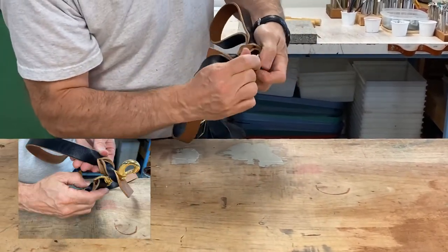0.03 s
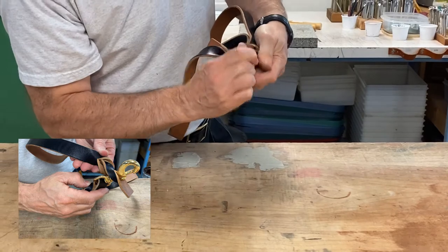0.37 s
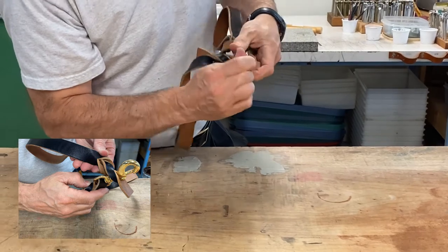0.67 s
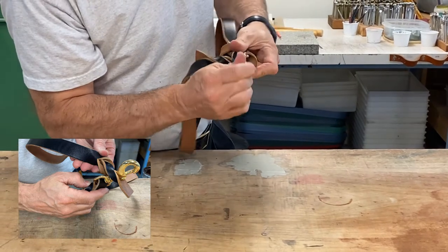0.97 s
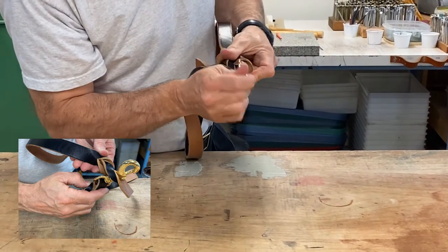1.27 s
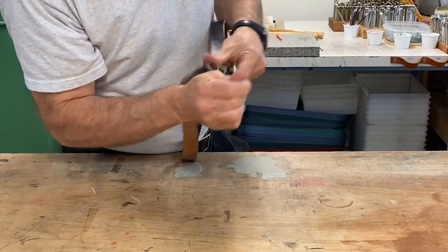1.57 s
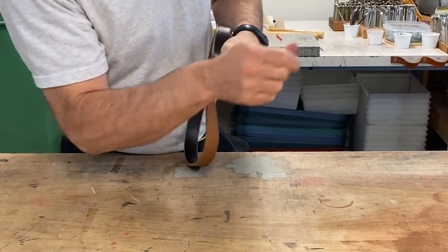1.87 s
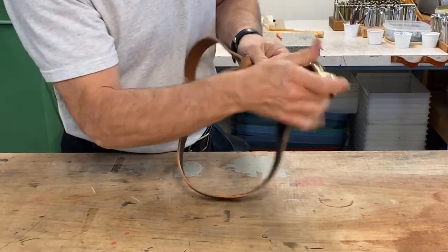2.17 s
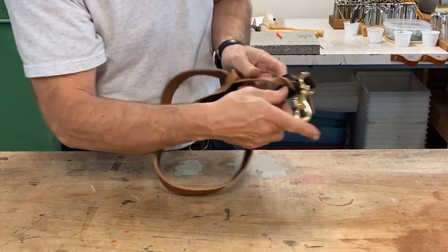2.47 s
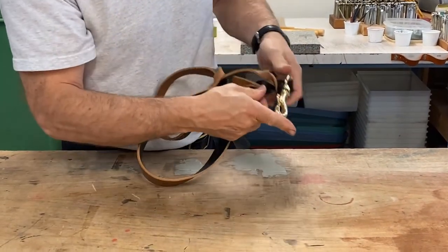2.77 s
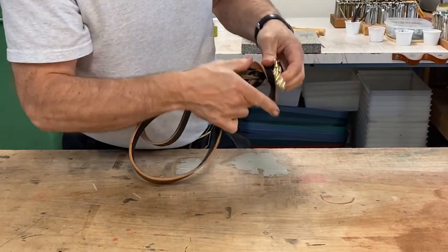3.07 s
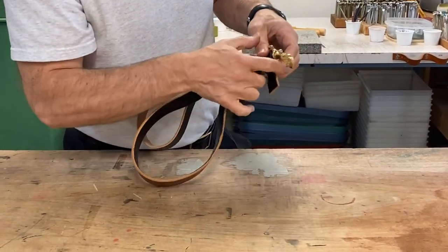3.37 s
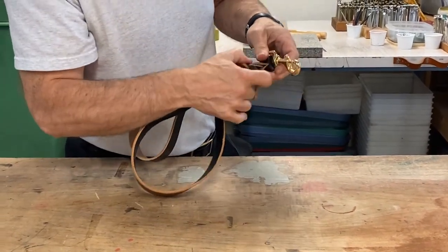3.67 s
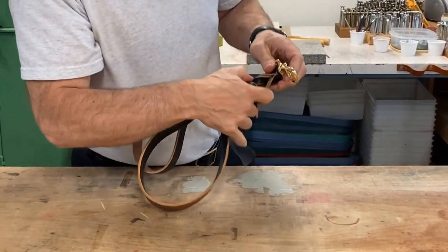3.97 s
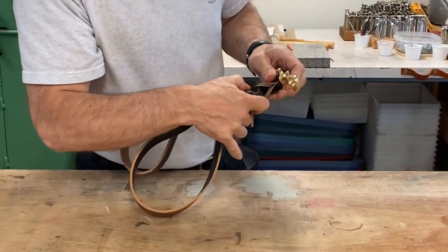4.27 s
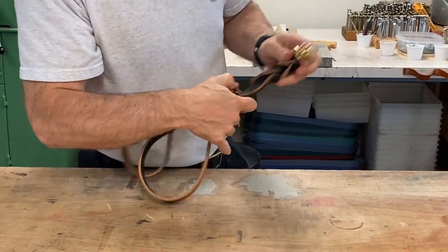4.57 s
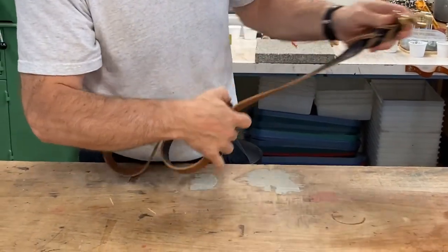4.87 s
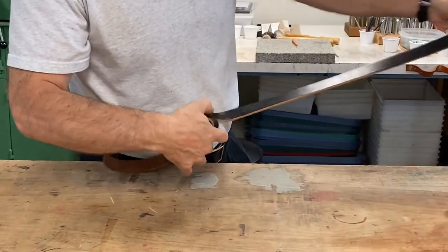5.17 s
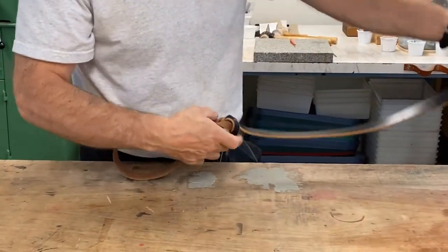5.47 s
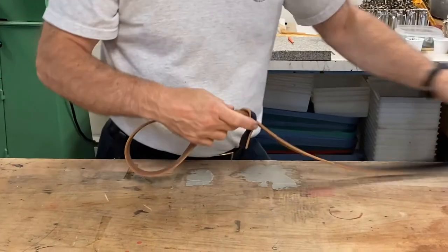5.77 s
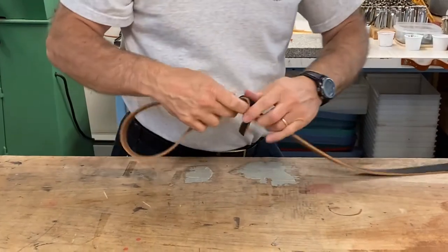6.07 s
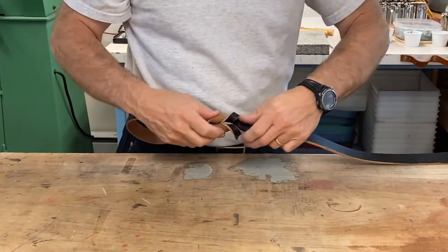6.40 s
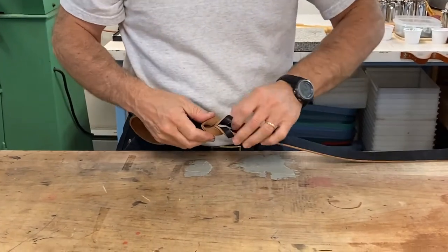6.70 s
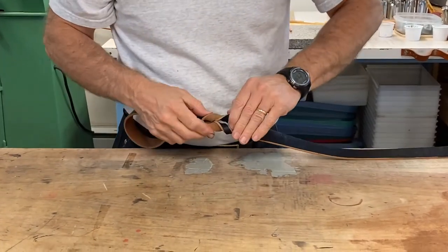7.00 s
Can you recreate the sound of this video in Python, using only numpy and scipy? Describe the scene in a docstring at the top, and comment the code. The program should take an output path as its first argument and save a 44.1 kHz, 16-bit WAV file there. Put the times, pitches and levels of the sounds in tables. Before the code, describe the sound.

Hands work a leather leash through its own slots, making short dry rubs, creaks and soft flaps while the brass fittings tick lightly. The strap is pulled out in one longer hissing slide. Then its brass snap drops on a wooden workbench with a loud, booming knock, and a few faint rustles follow. The microphone is close, in a small workshop with a low ventilation rumble.

```python
"""A low workshop rumble, and over it a leather leash worked through its own slots: it hisses, drags and
flaps by friction and bending, while its brass fittings tick. The strap is pulled out long. Then its
brass snap drops on the wooden bench and bounces; the impacts set the modes of the top booming and
overload the microphones of a nearby phone."""
import sys
import numpy as np
from scipy import signal
from scipy.fft import rfft, irfft
from scipy.io import wavfile
from scipy.ndimage import uniform_filter1d

SR = 44100
rng = np.random.default_rng(int(sys.argv[2]) if len(sys.argv) > 2 else 0)


def pcm_store(signal):
    """Save signal as 16-bit PCM."""
    levels = np.round(np.clip(np.atleast_2d(signal), -1, 1) * 32767)
    wavfile.write(sys.argv[1], SR, levels.astype(np.int16).T)


N = 310464
TIME = np.arange(N) / SR


def undb(db):
    """Decibels to amplitude gain."""
    return 10 ** (np.asarray(db) / 20)


def unit(x):
    """Normalise to rms 1."""
    return x / np.sqrt(np.mean(x ** 2))


def at_hz(points, hz):
    """Interpolate (Hz, value) points on a log-frequency axis."""
    f, value = np.transpose(points)
    return np.interp(np.log(np.maximum(hz, 1)), np.log(f), value)


def colour(x, points):
    """Minimum-phase filter with the given (Hz, dB) shape and unit power gain."""
    size = 4096
    magnitude = undb(at_hz(points, np.fft.rfftfreq(size, 1 / SR)))
    cepstrum = irfft(np.log(magnitude))
    cepstrum[1:size // 2] *= 2
    cepstrum[size // 2 + 1:] = 0
    response = irfft(np.exp(rfft(cepstrum)))
    return signal.fftconvolve(x, response / np.linalg.norm(response))[:len(x)]


def drift(hz):
    """Smooth random fluctuation with a spread near 1."""
    hold = int(SR / hz)
    steps = np.repeat(rng.standard_normal(N // hold + 1), hold)
    return 1.4 * uniform_filter1d(steps, hold)[:N]


def add(track, start_s, sound):
    """Superpose a sound on a track."""
    i = int(start_s * SR)
    track[i:i + len(sound)] += sound[:N - i]


def ring(modes, t, scatter_db, detune):
    """Free vibration is a sum of damped modes; each contact shifts their weights and pitches a little."""
    hz, db, t60 = np.transpose(modes)[:, :, None]
    size = undb(db + scatter_db * rng.standard_normal(hz.shape))
    size[1::2] *= -1  # neighbouring modes swing in opposite directions
    hz = hz * (1 + detune * rng.standard_normal(hz.shape))
    return np.sum(size * np.sin(2 * np.pi * hz * t) * np.exp(-np.log(1000) * t / t60), axis=0)


# Room rumble. Each row: frequency in Hz, relative spectral density in dB.
RUMBLE_SPECTRUM = [(20, -31), (40, -8.5), (62, 1.5), (80, -5), (120, -11.5), (165, -23), (260, -24),
                   (500, -30), (800, -34.5), (1300, -47.5), (3000, -58), (16000, -57)]
# Ventilation tones. Each row: frequency in Hz, mean level in dB.
HUM_TONES = [(479.1, -69.5), (597.5, -76), (839.8, -75.5), (1082, -79.5)]

def ventilation(level_db=-46, side_db=-6, waver_db=2):
    """Broadband rumble and a few faint tones, all under slow random modulation."""
    mid, side = (colour(rng.standard_normal(N), RUMBLE_SPECTRUM) * undb(.5 * drift(1.7)) for _ in range(2))
    side = undb(side_db) * side
    hum = sum(undb(db + waver_db * drift(2.3)) * np.sin(2 * np.pi * hz * TIME + drift(1.7))
              for hz, db in HUM_TONES)
    return undb(level_db) * np.array([mid + side, mid - side]) + hum


# Reverberation time. Each row: frequency in Hz, time to fall 60 dB in seconds.
ROOM_DECAY = [(100, 0.73), (400, 0.46), (2000, 0.47), (6000, 0.43), (15000, 0.35)]
# Width of the echoes. Each row: frequency in Hz, side level against mid in dB.
ROOM_WIDTH = [(100, -6.5), (500, -4), (1300, -4), (2500, -7), (4000, -19.5), (7000, -21), (9000, -9)]

def reverberation(x, build_s=0.0019):
    """A diffuse field builds up, then decays exponentially; the treble dies first."""
    hz, t, cells = signal.stft(rng.standard_normal((2, SR)), SR, nperseg=256)
    cells = cells * np.exp(-np.log(1000) * t / at_hz(ROOM_DECAY, hz)[:, None])
    cells[1] *= undb(at_hz(ROOM_WIDTH, hz))[:, None]
    build = (1 - np.exp(-TIME[:SR] / build_s)) ** 2
    mid, side = signal.istft(cells)[1][:, :SR] * build
    response = np.array([mid + side, mid - side]) / np.linalg.norm(mid)
    return signal.fftconvolve(x[None], response, axes=1)[:, :N]


# Balance of the microphone ports. Each row: frequency in Hz, left minus right in dB.
PORT_BALANCE = [(80, -3), (220, 7), (1300, 4.5), (2300, 0), (15000, 0)]
# Phase between the ports. Each row: frequency in Hz, lead of the left in radians.
PORT_LEAD = [(120, 0.86), (700, 0), (1400, 1.4), (1900, 0.22), (3500, 0), (7400, 0), (9200, -3.5),
             (11100, -6), (13200, -10), (15200, -11.5)]

def ports(x):
    """Level and phase differences give direction: low mids lean left, the top treble leads on the right."""
    hz = np.fft.rfftfreq(N, 1 / SR)
    lean = undb(at_hz(PORT_BALANCE, hz) / 2)
    turn = np.exp(1j * at_hz(PORT_LEAD, hz))
    return irfft(rfft(x) * np.array([lean * turn, 1 / lean]), N)


def friction(spectrum, slips_per_s, spread_db):
    """Tiny slips make shot noise; as the contact travels, narrow upper resonances come and go. Rms 1."""
    slips = rng.random(N) < slips_per_s / SR
    size_db = spread_db * np.minimum(rng.exponential(size=N), 5)
    impulses = unit(slips * rng.choice([-1, 1], N) * undb(size_db))
    hz, _, cells = signal.stft(colour(impulses, spectrum), SR, nperseg=512)
    depth_db = np.interp(hz, [500, 1800], [1, 3.6])[:, None]
    ripple = uniform_filter1d(rng.standard_normal(cells.shape), size=4, axis=0)  # smooth in frequency
    ripple = uniform_filter1d(ripple, size=12, axis=1)  # and in time
    return unit(signal.istft(cells * undb(depth_db * unit(ripple)))[1][:N])


# Fibre hiss and edge drag. Each row: frequency in Hz, relative spectral density in dB.
HISS_SPECTRUM = [(1800, -16.5), (2800, -0.5), (4300, 1), (6500, -3), (8500, -2.5), (12000, -4.5),
                 (16000, -9)]
DRAG_SPECTRUM = [(120, -5.5), (220, 12), (400, 4.5), (700, 2.5), (1300, -0.5), (2300, -1.5), (3200, -10.5),
                 (5000, -24.5)]
# Short pushes by the fingers. Each row: middle and length in seconds, hiss and drag levels in dB.
FINGER_STROKES = [(0.302, 0.057, -54.5, -60), (0.455, .06, -60, -90), (0.593, 0.071, -53.5, -49),
                  (0.783, 0.12, -66, -66), (0.997, 0.064, -59, -66), (1.188, 0.2, -66, -68),
                  (1.624, 0.087, -39.5, -39), (1.871, 0.11, -61, -62.5), (1.984, 0.27, -59.5, -61.5),
                  (2.227, 0.059, -49.5, -50), (2.411, 0.062, -58.5, -53.5), (2.557, 0.1, -55, -52.5),
                  (2.691, 0.14, -47, -51.5), (2.88, 0.051, -54.5, -50), (2.998, 0.27, -58, -83),
                  (3.196, 0.14, -56.5, -66), (3.267, .06, -56, -55.5), (3.396, .05, -55.5, -51.5),
                  (3.599, 0.22, -53, -56.5), (3.757, 0.051, -44.5, -47.5), (3.853, .045, -44, -44.5),
                  (3.947, 0.058, -57, -54.5), (4.203, 0.067, -56, -53), (4.367, 0.19, -52, -51.5),
                  (4.496, .035, -47, -48), (5.682, 0.07, -56, -47), (5.786, 0.14, -53.5, -63),
                  (6.172, 0.16, -56.5, -70.5), (6.503, 0.047, -65, -69), (6.64, .06, -67.5, -78),
                  (6.8, 0.15, -72.5, -78), (7.02, 0.042, -60, -62)]
# The whole strap runs through the slot. Each row: time in seconds, hiss and drag levels in dB.
LONG_PULL = [(4.53, -62, -55), (4.58, -45.5, -45.5), (4.72, -50.5, -49), (4.82, -45.5, -49.5),
             (4.99, -40, -52.5), (5.11, -49, -56), (5.25, -56, -58), (5.295, -51, -43), (5.34, -96, -62)]

def sliding(grip_hz=70, hiss_grip_db=0.9, drag_grip_db=1.15, fidget_hz=7, fidget_db=3.5):
    """Sliding friction: fibres slip in a fine hiss, while the edges catch in coarser, uneven steps."""
    t = TIME[::40]
    middle, length, stroke_hiss_db, stroke_drag_db = np.transpose(FINGER_STROKES)[:, :, None]
    swells = np.exp(-np.abs(2 * (t - middle) / length) ** 1.7)  # exponent 1 is pointed, 2 bell-shaped
    pull_s, pull_hiss_db, pull_drag_db = np.transpose(LONG_PULL)
    waver_db, grip = fidget_db * drift(fidget_hz), drift(grip_hz)

    def effort(stroke_db, pull_db, held_db):
        """One gain for the strokes, the pull and the rustle of a strap never held quite still."""
        strokes = np.interp(TIME, t, np.linalg.norm(undb(stroke_db) * swells, axis=0))
        pull = undb(np.interp(TIME, pull_s, pull_db)) * (TIME > pull_s[0]) * (TIME < pull_s[-1])
        return np.hypot(strokes, pull + undb(held_db + waver_db))

    hiss = friction(HISS_SPECTRUM, slips_per_s=4600, spread_db=2.5) * undb(hiss_grip_db * grip)
    drag = friction(DRAG_SPECTRUM, slips_per_s=1100, spread_db=3.0) * undb(drag_grip_db * grip)
    hiss *= effort(stroke_hiss_db, pull_hiss_db, held_db=-77)
    drag *= effort(stroke_drag_db, pull_drag_db, held_db=-78.5)
    return hiss + drag


# Response of the shaken strap. Each row: frequency in Hz, relative spectral density in dB.
SCUFF_SPECTRUM = [(100, -25.5), (220, -1.5), (330, 3), (490, 2), (700, -19), (1100, -15), (1450, -21.5),
                  (2050, -13.5), (2450, -14), (3000, -26), (6000, -43)]
# The strap jerks through a slot or brushes past. Each row: middle and length in seconds, level in dB.
STRAP_SCUFFS = [(1.63, 0.12, -45.5), (2.431, 0.092, -49.5), (2.583, 0.079, -40.5), (2.666, 0.059, -36.5),
                (2.714, 0.054, -33.5), (2.875, 0.0344, -34), (3.857, 0.014, -46), (4.382, 0.06, -39.5),
                (4.572, 0.047, -36.5), (4.66, 0.097, -46.5), (4.907, 0.13, -49), (5.214, 0.21, -52),
                (5.694, 0.16, -46.5)]

def scuffs():
    """Stick-slip motion shakes the whole strap, which answers with a hollow, creaking rasp."""
    pressure = sum(undb(db) * np.exp(-np.abs(2 * (TIME - middle) / length) ** 3)
                   for middle, length, db in STRAP_SCUFFS)
    return pressure * friction(SCUFF_SPECTRUM, slips_per_s=370, spread_db=-0.74)


# Leather faces rasp as they flap. Each row: frequency in Hz, relative spectral density in dB.
RASP_SPECTRUM = [(100, -16), (200, 2.5), (500, 0.5), (900, -11.5), (2000, -24), (6000, -44)]
# A loop flexes and lets go. Each row: start in seconds, peak level in dB, first and last pitch in Hz.
LOOP_FLAPS = [(1.21, -36.5, 620, 270), (1.545, -32, 810, 270), (2.202, -26, 1830, 270),
              (2.675, -23.5, 715, 325), (2.696, -28, 680, 355), (3.287, -39, 2140, 425),
              (4.6, -21.5, 600, 275), (4.678, -33.5, 830, 330), (4.858, -31, 600, 310),
              (5.113, -36, 1490, 285), (5.288, -36, 700, 295), (5.324, -35, 610, 300),
              (6.104, -28, 550, 300), (6.276, -34, 500, 300), (6.527, -40.5, 500, 308),
              (6.983, -31, 550, 270)]

def flaps(glide_s=.002, rise_s=0.019, fade_s=0.0036, echo_s=.0155, echo_db=-7, rasp_db=-11):
    """Dispersion: short bending waves run faster, so each flap falls in pitch. Its low end returns once."""
    out, t = np.zeros(N), TIME[:SR // 10]
    shape = (1 - np.exp(-t / rise_s)) ** 2 * np.exp(-t / fade_s)
    for start, db, first_hz, last_hz in LOOP_FLAPS:
        hz = last_hz + (first_hz - last_hz) * np.exp(-t / glide_s)
        swing = undb(db) * shape / shape.max()
        rasp = undb(rasp_db) * colour(rng.standard_normal(len(t)), RASP_SPECTRUM)
        add(out, start, swing * (np.sin(2 * np.pi * np.cumsum(hz) / SR) + rasp))
        add(out, start + echo_s, undb(echo_db) * swing * np.sin(2 * np.pi * .85 * last_hz * t))
    return out


# A small hard contact. Each row: frequency in Hz, relative spectral density in dB.
TICK_SPECTRUM = [(300, -10.5), (900, -1.5), (2000, 2), (4200, 3), (7000, 1.5), (11000, -5), (16000, -11.5)]
# The brass ring in the fingers. Each row: frequency in Hz, relative level in dB, T60 in seconds.
RING_MODES = [(2400, -1.5, 0.033), (3510, -5, .035), (4330, 2.5, 0.034), (5710, 2, 0.022), (7400, -9, .04),
              (11900, -9.5, 0.046)]
# Fittings and strap edges touch. Each row: start in seconds, relative level in dB, bass weight in dB.
FITTING_TICKS = [(0.029, -37, -14.5), (0.324, -40.5, -11), (0.5258, -37, -23), (0.9755, -34.5, -6.5),
                 (1.0715, -60, -8), (1.3618, -31.5, -10.5), (1.5662, -29.5, -9.5), (2.1908, -36.5, -15),
                 (2.201, -30.5, 4), (2.4407, -44, 1), (2.994, -39.5, -20.5), (3.1423, -40, -18),
                 (3.2884, -35, 6.5), (3.3867, -40.5, -12), (3.71, -37.5, -9), (3.9505, -34, -15),
                 (4.1755, -36.5, -14.5), (4.2108, -42, -5), (4.2524, -41.5, -12), (4.3026, -37, -7),
                 (4.358, -35, -7), (4.3844, -40, -23), (4.402, -39, -10), (4.4258, -37, -7),
                 (4.4762, -31.5, -16), (4.482, -33, -15), (4.5001, -28.5, -22), (4.566, -29.5, -4),
                 (5.1079, -32, 0), (6.2498, -42, -0.5)]

def ticks(rise_s=0.00039, fade_s=0.001, crunch_db=-11, crunch_s=0.011, gain_db=2, held_db=-23, free_db=-10):
    """Impact excitation: a dry crack, a crunch of smaller contacts and a brass ring damped by fingers."""
    out, t = np.zeros(N), TIME[:SR // 5]
    decay = np.exp(-t / fade_s) + undb(crunch_db) * np.exp(-t / crunch_s)
    press = (1 - np.exp(-t / rise_s)) * decay
    for start, db, bass_db in FITTING_TICKS:
        slope_db = 0.52 * (bass_db + 10.5)  # softer contacts lose more per octave
        spectrum = [(hz, level - slope_db * np.log2(hz)) for hz, level in TICK_SPECTRUM]
        contacts = colour(rng.standard_normal(len(t)) * press, spectrum)
        out_of_fist = 4.15 < start < 4.6  # the uncovered brass rings louder
        clink = undb(free_db if out_of_fist else held_db) * ring(RING_MODES, t, scatter_db=2.5, detune=0.016)
        add(out, start, undb(db + gain_db) * (contacts + clink))
    return out


# The bench sways on its frame. Each row: time in seconds, level in dB.
SWAY_ENVELOPE = [(5.82, -64.5), (5.84, -36), (5.95, -37.5), (6.06, -26), (6.2, -33.5), (6.28, -31),
                 (6.35, -41), (6.45, -55)]

def bench_sway(hz=65, rumble_db=-8):
    """After the blow the heavy bench rocks in a low mode; the strap settles on it with an uneven rumble."""
    phase = 2 * np.pi * np.cumsum(hz * (1 + 0.015 * drift(7.6))) / SR
    spectrum = [(90, -17.5), (155, 6), (230, -1), (480, -4.5), (800, -24.5), (2000, -54.5)]
    rumble = colour(rng.standard_normal(N), spectrum)
    envelope = undb(np.interp(TIME, *np.transpose(SWAY_ENVELOPE), left=-120, right=-120))
    return envelope * (np.sqrt(2) * np.sin(phase) + undb(rumble_db) * rumble)


# Crack and thud of brass on wood. Each row: frequency in Hz, relative spectral density in dB.
CRACK_SPECTRUM = [(200, -11.5), (900, 1), (2100, 3.5), (3800, -15.5), (8000, -23.5), (16000, -29.5)]
THUD_SPECTRUM = [(35, -13), (110, -5.5), (230, 1), (430, 3.5), (680, -7), (1050, -2.5), (2100, -10),
                 (2900, -21.5), (3600, -25), (16000, -36)]
# Wooden top and brass snap. Each row: frequency in Hz, relative level in dB, T60 in seconds.
BENCH_MODES = [(122.8, -19, 0.34), (197.5, -16.5, 0.14), (230, -14, 0.37), (295.1, -4.5, 0.2),
               (383.6, -11.5, 0.2), (409, -16, 0.19), (453, -12.5, 0.21), (488, -14, 0.38),
               (522.7, -15.5, .25), (614, -19.5, .3), (828.5, -25.5, 0.37), (969, -17.5, 0.28),
               (1016, -21, .22), (1046, -19.5, 0.29), (1275, -19.5, 0.29), (1655, -28.5, 0.29),
               (2130, -22, 0.24), (2195, -29, .3)]
SNAP_MODES = [(4330, -15, 0.43), (7450, -1, 0.32), (7800, -8, .25), (8280, 1, 0.29), (10530, -1.5, 0.25),
              (11550, -7.5, .28), (12370, 1.5, .3), (14400, -2, .25)]
# The snap lands and bounces. Each row: start in seconds, relative force in dB, contact time in seconds.
SNAP_IMPACTS = [(5.8263, 1, 0.0024), (5.8510, -0.5, 0.0042), (5.866, -9.5, 0.00065), (5.889, -14.5, 0.0022)]

def snap_drop(crack_db=6, swell_s=0.0033, thud_s=0.022, wood_db=2, brass_db=-31, lead_in_db=-31):
    """Each impact excites the modes of both snap and bench. Returns the clatter and the ringing wood."""
    clatter, wood, t = np.zeros(N), np.zeros(N), TIME[:SR]
    swell = 1 - np.exp(-t / swell_s)  # the heavy top takes a moment to move
    for start, db, contact_s in SNAP_IMPACTS:
        crack = undb(crack_db) * colour(np.exp(-t / contact_s) * rng.standard_normal(SR), CRACK_SPECTRUM)
        thud = colour(swell * np.exp(-t / thud_s) * rng.standard_normal(SR), THUD_SPECTRUM)
        brass = undb(brass_db) * ring(SNAP_MODES, t, scatter_db=2, detune=.008)
        add(clatter, start, undb(db) * (crack + thud + brass))
        add(wood, start, undb(db + wood_db) * swell * ring(BENCH_MODES, t, scatter_db=1.0, detune=0.00081))
    # a faint noise swells just before the first impact
    lead_in_swell = np.interp(TIME, [5.802, 5.813, 5.819, 5.825, 5.83], [0, 0.7, 1.0, 1.5, 0])
    lead_in_noise = colour(rng.standard_normal(N), TICK_SPECTRUM)
    lead_in_noise += colour(rng.standard_normal(N), DRAG_SPECTRUM)
    return clatter + undb(lead_in_db) * lead_in_swell * lead_in_noise, wood


def scene():
    """Superposition: direct sound and reverberation reach the two ports over the ventilation."""
    rub, strap, clicks = sliding(), scuffs() + flaps(), ticks()
    clatter, wood = snap_drop()
    direct = rub + strap + clicks + clatter + wood + bench_sway()
    into_room = (undb(-8.5) * rub + undb(-11) * strap + undb(-6.0) * clicks
                 + undb(-13) * clatter + undb(-17.5) * wood)
    return ports(direct + reverberation(into_room)) + ventilation()


def record(dry):
    """Saturation: the knock overloads the phone, whose low-pass filter also cuts the top treble."""
    clipped = dry / (1 + np.abs(dry) ** 6) ** (1 / 6)
    low_pass = signal.ellip(10, .1, 80, 15900, fs=SR, output="sos")
    return signal.sosfilt(low_pass, clipped)


dry = scene()
out = record(dry)
pcm_store(out)
```